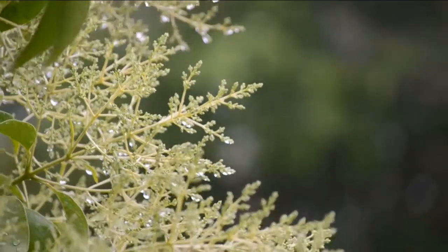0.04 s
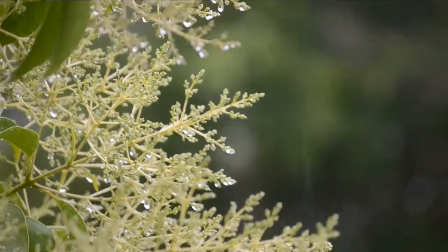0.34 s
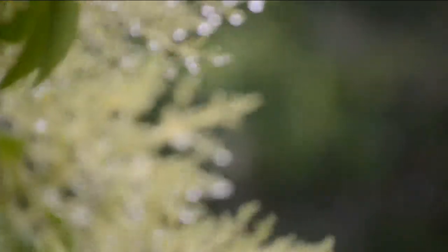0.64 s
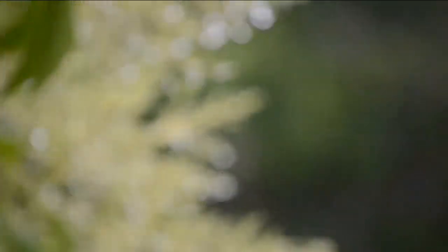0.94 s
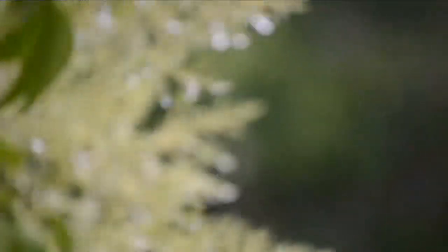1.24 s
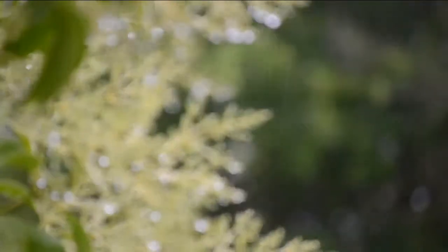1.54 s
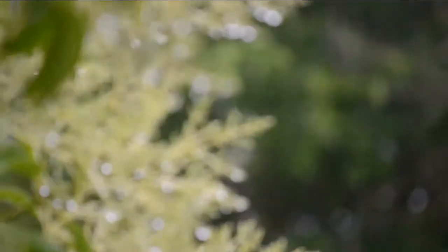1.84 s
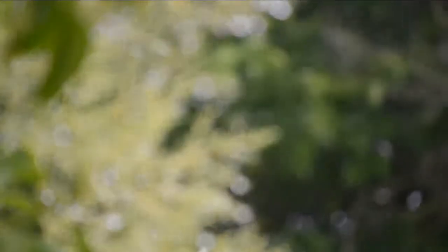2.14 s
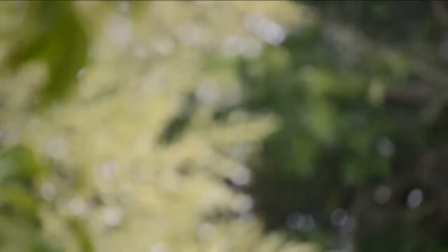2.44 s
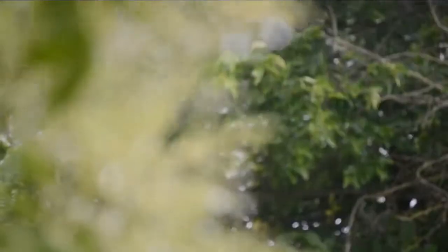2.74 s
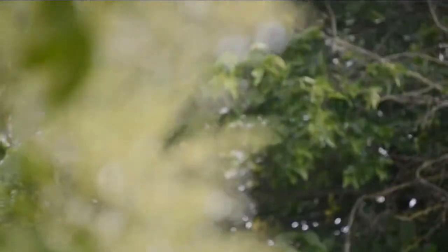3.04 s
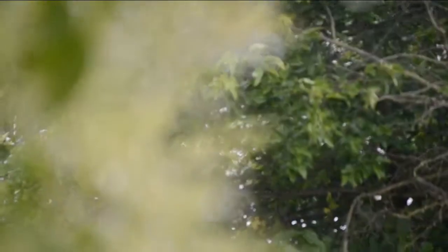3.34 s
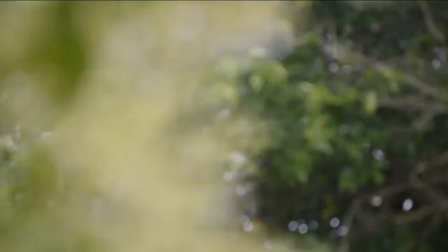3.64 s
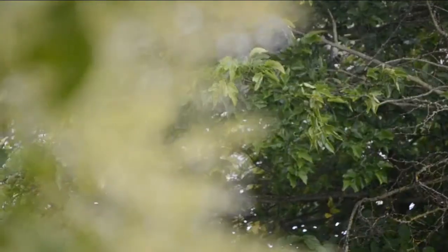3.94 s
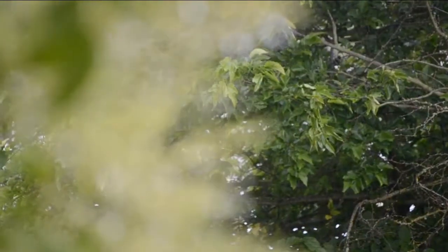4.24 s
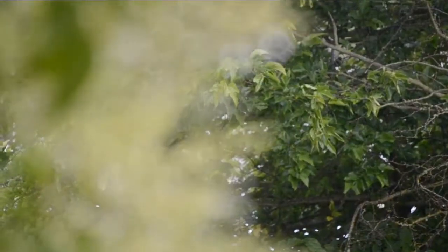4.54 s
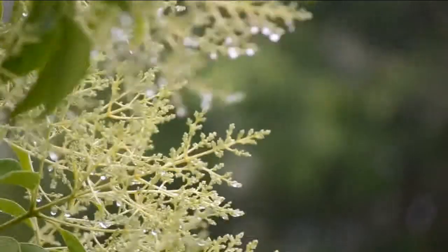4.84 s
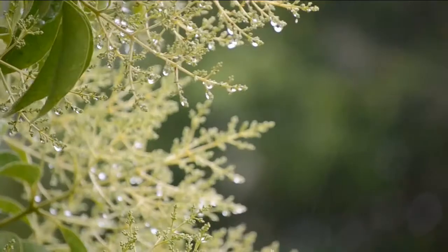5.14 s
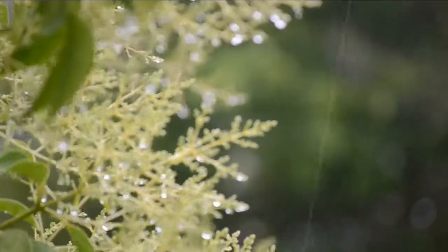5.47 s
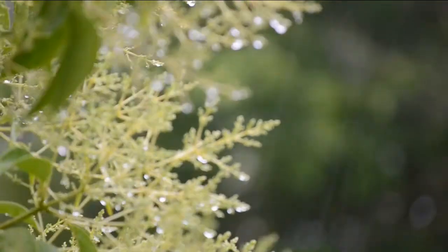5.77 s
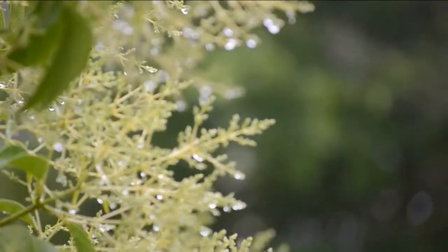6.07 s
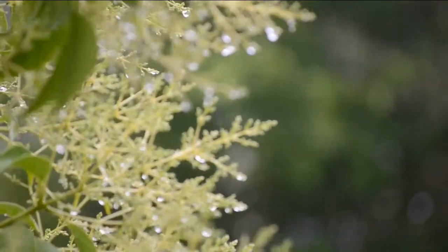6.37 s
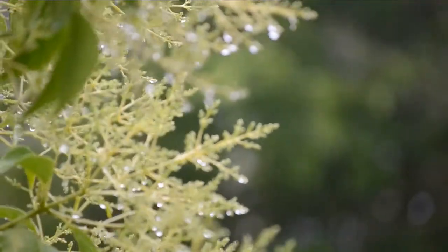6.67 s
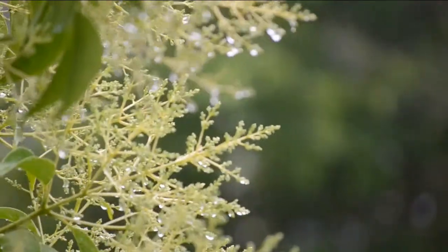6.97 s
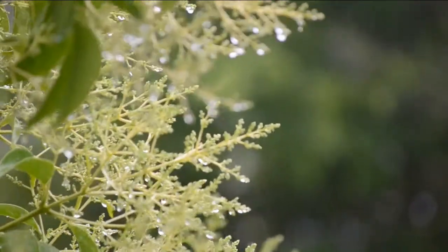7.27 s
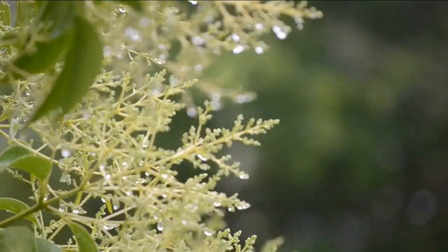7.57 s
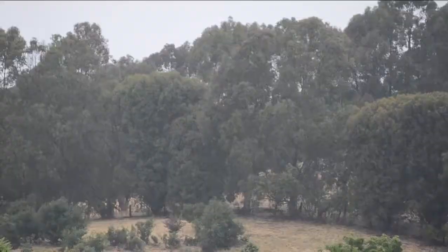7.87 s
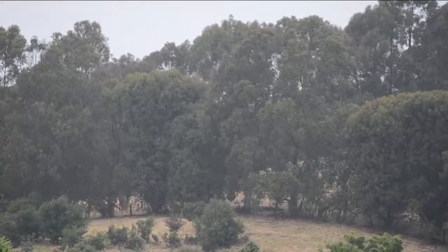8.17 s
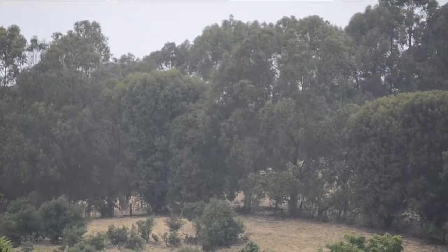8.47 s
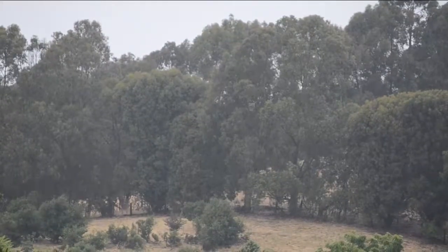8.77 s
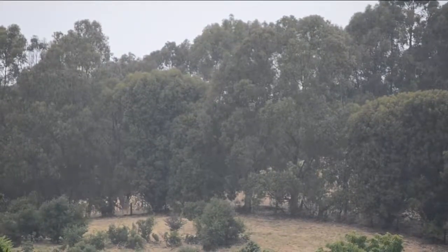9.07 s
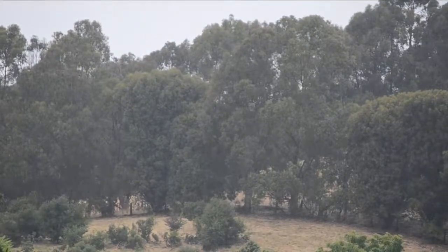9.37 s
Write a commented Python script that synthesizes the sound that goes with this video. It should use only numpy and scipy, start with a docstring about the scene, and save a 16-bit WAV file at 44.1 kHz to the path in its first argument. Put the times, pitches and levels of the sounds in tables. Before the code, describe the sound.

Steady rain falls on a garden for nearly ten seconds: a soft wash from distant trees, a fine hiss, and drops pattering on nearby leaves. A small bird deep in the foliage gives three high falling whistles at about 0.5, 1.1 and 1.6 seconds. From 2.1 to 5.1 seconds a closer bird sings nine short, rapid trills, each alternating lower and higher pips. Fat drips splash close by throughout, the sharpest at 2.6 seconds, and hollow plops hit soaked earth between 1.8 and 5.5 seconds. The rain swells slightly around 4 to 5 seconds, with a few faint distant chirps. The near bird ends with two phrases of loud downward slurs at about 6 and 7.1 seconds, lightly echoed by the trees. At 7.7 seconds the sound drops out for an instant, then the rain continues without birds, its wash slightly fuller.

```python
"""Steady rain on a garden: a soft wash from the far trees, drops pattering on leaves, fat drips
splashing and plopping close by. Small birds sing three falling whistles, nine two-voiced trills and
two slurred phrases, echoed by the foliage. The wash is patchy noise, each drop a noise burst and each
bird note a gliding sine. Near the end the sound drops out for an instant and resumes facing the
wooded hillside."""
import sys
import numpy as np
from scipy import signal
from scipy.fft import rfft, irfft, next_fast_len
from scipy.io import wavfile
from scipy.ndimage import uniform_filter1d, map_coordinates

SR = 44100
rng = np.random.default_rng(int(sys.argv[2]) if len(sys.argv) > 2 else 0)


def file_out(sig):
    """Save sig as 16-bit WAV at sys.argv[1]."""
    # one column per channel
    cols = np.atleast_2d(sig).T
    # limit, then scale
    lim = np.clip(cols, -1, 1)
    pcm = np.round(lim * 32767).astype(np.int16)
    wavfile.write(sys.argv[1], SR, pcm)


N = 423801

BREAK_S, RESUME_S = 7.733, 7.745
# bright splash of a drop on a leaf: (frequency [Hz], gain [dB])
SPLASH_EQ = [(60, -25), (250, -9), (900, -6), (2200, 4.5), (4000, 2.5), (6000, 0.5), (9500, 0.5),
             (12000, -5)]
# dull pat of a drop on a broad leaf: (frequency [Hz], gain [dB])
PAT_EQ = [(100, -27), (330, 4.5), (900, -3), (2100, 6.5), (4000, -1), (10000, -11)]


def wash():
    """Countless far drops merge into a soft roar, with a hiss of fine spray on top."""
    # tone of the garden, the hillside and the spray: (frequency [Hz], gain [dB])
    garden_eq = [(25, -37), (48, -25), (66, -20), (90, -10), (150, -13.5), (190, -6), (280, -7.5),
                 (360, -5), (450, -7), (690, -1.5), (810, -2.5), (930, 0.5), (1400, -4), (2500, -9),
                 (4200, -13.5), (6000, -21.5), (11000, -61)]
    hillside_eq = [(25, -36), (48, -29), (85, -14.5), (150, -15.5), (215, -7), (340, -6.5), (490, -8),
                   (600, -2.5), (820, -4), (950, 0), (1400, -5), (2500, -10), (4200, -15.5), (6000, -25),
                   (11000, -75)]
    spray_eq = [(1000, -39), (3000, 6.5), (5000, 2), (7000, 3.5), (9500, 1.5), (12000, -3.5)]
    t = np.arange(N) / SR
    gust_db = 1.5 * np.exp(-((t - 4.95) / 0.55) ** 2)  # one gust shakes more water from the trees
    garden = amp(-38.5 + gust_db) * rush(garden_eq, patchy_db=1.03)
    hillside = amp(-36.5) * rush(hillside_eq, patchy_db=1.03)
    roar = amp(0.13 * wobble(6.1)) * np.where(t < BREAK_S, garden, hillside)
    spray_db = -48.5 + 0.93 * rain_swell_db() + 0.9 * wobble(25)
    return roar + amp(spray_db) * rush(spray_eq, patchy_db=2.5)


def patter():
    """Rain hits the nearby leaves: splashes and ticks swell with it over an even bed of dull pats."""
    level_db = -49.5 + 1.03 * rain_swell_db()
    splashes = unit(colour(shower(count=420, spread_db=14.5, rise=0.0018, t60=0.059), SPLASH_EQ))
    ticks = unit(colour(shower(count=350, spread_db=10, rise=0.0001, t60=0.002), SPLASH_EQ))
    pats = unit(colour(shower(count=260, spread_db=1.5, rise=0.00043, t60=0.017), PAT_EQ))
    return amp(level_db) * (amp(4) * splashes + amp(-9) * ticks) + amp(-48.5) * pats


def rain_swell_db():
    """The rain rises and falls about its average."""
    # how hard it rains on the nearby leaves: (time [s], relative level [dB])
    intensity = [(0, -51), (1.12, -54), (2.5, -48), (3.93, -45), (4.95, -47.5), (5.5, -46.5), (6.15, -50.5),
                 (7, -47), (8.7, -51.5), (9.6, -50.5)]
    db = np.interp(np.arange(N) / SR, *np.transpose(intensity))
    return db - db.mean()


def shower(count, spread_db, rise, t60):
    """Drops land at random moments, each with its own size and splash time."""
    track = np.zeros(N)
    for when, size, life in rng.random((count, 3)):
        drop = burst(rise, t60 * 2 ** (2 * life - 1), grain_db=1.5)
        add(track, when * N / SR, amp(spread_db * size ** 2) * drop)
    return track


def burst(rise, t60, grain_db):
    """A drop shatters: a cloud of droplet ticks swells and dies away (rise and t60 in seconds)."""
    t = np.arange(SR // 8) / SR
    ticks, sizes = rng.standard_normal((2, len(t)))
    envelope = (1 - np.exp(-t / rise)) * amp(-60 * t / t60)
    return unit(ticks * amp(grain_db * sizes)) * envelope / envelope.max()


def drips():
    """Fat drips from the branches splash or pat close by."""
    # close splashes: (time [s], relative level [dB], decay t60 [s])
    splash_hits = [(0.4344, -29, 0.049), (0.7893, -27.5, 0.076), (0.9862, -26, .045), (1.2164, -32, 0.041),
                   (1.8357, -29, 0.12), (2.145, -27, 0.085), (2.3067, -23.5, 0.074), (2.3645, -27.5, .055),
                   (2.4647, -28, .06), (2.4774, -26, 0.058), (2.5628, -14, .077), (2.6526, -27, .06),
                   (2.7836, -26.5, 0.042), (2.96, -29.5, 0.12), (3.0616, -26.5, .051), (3.5803, -26, 0.093),
                   (3.7737, -25.5, 0.083), (3.908, -23.5, 0.08), (4.214, -24.5, 0.084),
                   (5.3284, -22.5, 0.033), (5.6688, -28, .06), (5.8995, -27.5, .06), (6.5286, -26, 0.03),
                   (7.0559, -37, 0.039), (7.6194, -28.5, 0.2), (7.8406, -29, .06), (8.074, -27, 0.034)]
    # pats on broad leaves: (time [s], relative level [dB])
    pat_hits = [(2.559, -22), (2.7078, -21.5), (4.2122, -21), (4.352, -18.5), (5.3283, -19), (5.477, -24),
                (6.2711, -20), (7.692, -21.5)]
    splashes, pats = np.zeros(N), np.zeros(N)
    for s, db, t60 in splash_hits:
        add(splashes, s - 0.001, amp(db - 4) * burst(rise=0.00091, t60=t60, grain_db=1.5))
    for s, db in pat_hits:
        add(pats, s, amp(db - 3.5) * burst(rise=0.00058, t60=0.021, grain_db=0.5))
    return colour(splashes, SPLASH_EQ) + colour(pats, PAT_EQ)


def plops():
    """A heavy drop thuds into soaked earth and rings one broad, short resonance."""
    # hollow plops: (time [s], resonance [Hz], peak level [dB], decay t60 [s])
    hits = [(1.798, 720, -28.5, .07), (2.086, 630, -30, 0.12), (2.110, 418, -34, 0.059),
            (2.594, 470, -33, .07), (4.030, 1240, -25.5, .07), (4.143, 1080, -30, 0.047),
            (4.966, 710, -25, 0.05), (4.984, 1180, -29, 0.14), (5.327, 940, -26.5, .05),
            (5.372, 350, -33, .08), (5.476, 380, -35, 0.059)]
    track = np.zeros(N)
    for s, hz, db, t60 in hits:
        thud = burst(rise=0.0013, t60=t60, grain_db=-2.5)
        b, a = signal.iirpeak(hz, Q=1.7, fs=SR)
        ring = signal.lfilter(b, a, signal.lfilter(b, a, thud))
        add(track, s, amp(db) * ring / np.abs(ring).max())
    return track


def trills():
    """The near bird trills: the two sides of its syrinx take turns, one low, one high."""
    # trills: (time [s], pip spacing [s], high voice base level [dB])
    cues = [(2.117, .0427, -35), (2.445, 0.044, -34), (2.758, 0.047, -32.5), (3.088, .046, -34),
            (3.463, 0.048, -31.5), (3.825, .046, -34), (4.197, .0455, -34.5), (4.545, .045, -29.5),
            (4.893, 0.049, -30)]
    # the four pips of a trill: (low voice accent [dB], high voice accent [dB])
    accents = [(-1, -1.3), (0, 0), (0, -1.3), (-2, -4.5)]
    # low pip: (time from its centre [s], base pitch [Hz], relative level [dB])
    low_pip = [(-.011, 3110, -6), (-.005, 3010, -.5), (.004, 2930, -1.5), (.017, 2860, -11)]
    # high pip: (time after the low one [s], pitch [ratio], relative level [dB])
    high_pip = [(.013, 1.008, -2.5), (0.023, .998, -1.5), (.034, .994, -2.5), (0.046, .99, -7)]
    song = np.zeros(N)
    for s, spacing, high_db in cues:
        high_hz = 3745 - 28 * (s - cues[0][0])  # the high voice sinks as the song goes on
        for k, (low_accent, high_accent) in enumerate(accents):
            at = s + k * spacing
            # both voices sag a little from pip to pip, and no two pips are quite alike
            length, low_pitch, low_effort, high_pitch, high_effort = rng.standard_normal(5)
            low = np.array(low_pip) * [1 + 0.0796 * length, 1 - 0.0052 * k + 0.006 * low_pitch, 1]
            high = np.array(high_pip) * [1, high_hz * (1 - 0.0137 * k + 0.004 * high_pitch), 1]
            low_gain = amp(-30 + low_accent + 1.6 * low_effort)
            high_gain = amp(high_db + high_accent + 1.6 * high_effort)
            add(song, at + low[0, 0], low_gain * glide(low, waver_db=1.5))
            add(song, at + high[0, 0], high_gain * glide(high, waver_db=0.5))
    return song


def slurs():
    """The near bird ends in two phrases: soft lead-in notes, then loud downward slurs."""
    # notes: (time [s], length [s], opening [Hz], middle [Hz], closing [Hz], level [dB])
    notes = [(6.003, .044, 2650, 2880, 3040, -42.5), (6.01, .04, 4280, 4320, 4300, -50),
             (6.044, 0.041, 3710, 3550, 3700, -39.5), (6.087, 0.058, 3560, 3430, 3520, -41.5),
             (6.153, .054, 2800, 3260, 3630, -39), (6.188, .069, 2893, 2742, 2410, -28),
             (6.254, .032, 3320, 2850, 2530, -27), (7.097, .02, 3850, 3720, 3560, -42),
             (7.109, 0.037, 3360, 2960, 2800, -30), (7.142, .139, 3620, 2884, 2280, -28.5),
             (7.275, 0.029, 2450, 2320, 2220, -39)]
    song = np.zeros(N)
    for s, *shape in notes:
        add(song, s, glide(contour(*shape, bend=2.6, fade_db=4), waver_db=1.5))
    return song


def whistles():
    """Birds deep in the foliage repeat one falling whistle and chirp now and then."""
    # three falling whistles and a faint late one: (time [s], relative level [dB])
    whistle_cues = [(0.489, -38), (1.056, -38.5), (1.574, -36.5), (6.845, -49)]
    # their notes: (delay [s], length [s], opening [Hz], middle [Hz], closing [Hz], accent [dB])
    notes = [(0, 0.039, 4820, 4550, 4500, 0), (0.027, 0.039, 3440, 3280, 3270, -4),
             (0.034, .07, 4650, 4520, 4200, -6.5), (.058, 0.128, 4350, 3610, 2765, 0)]
    # faint chirps from further off: (time [s], pitch [Hz], relative level [dB])
    chirp_cues = [(4.59, 4050, -44), (4.87, 3900, -56), (5.19, 3980, -44)]
    # one chirp: (time [s], pitch [ratio], relative level [dB])
    chirp_shape = [(0, 1.02, -1), (.015, .99, 2.5), (.04, .96, -9)]
    song = np.zeros(N)
    for s, db in whistle_cues:
        for delay, *shape in notes:
            add(song, s + delay, amp(db) * glide(contour(*shape, bend=1.05, fade_db=3.5), waver_db=3))
    for s, hz, db in chirp_cues:
        add(song, s, amp(db) * glide(np.array(chirp_shape) * [1, hz, 1], waver_db=6.5))
    return song


def contour(length, opening, middle, closing, db, bend, fade_db):
    """A note slides onto its middle pitch, swells and slides off; more bend holds it there longer."""
    u = np.linspace(-1, 1, 33)
    hz = middle + (np.where(u < 0, opening, closing) - middle) * np.abs(u) ** bend
    return np.column_stack([length * (u + 1) / 2, hz, db - fade_db * u ** 2])


def glide(points, waver_db):
    """One pure, wavering bird note through (time [s], pitch [Hz], level [dB]) points."""
    s, hz, db = np.transpose(points)
    t = np.arange(s[0], max(s[-1], s[0] + 0.01), 1 / SR)
    phase = 2 * np.pi * np.cumsum(np.interp(t, s, hz)) / SR
    fades = np.clip(np.minimum(t - t[0], t[-1] - t) / 0.0025, 0, 1)
    waver = wobble(130, size=SR // 2)[:len(t)]
    return np.sqrt(2) * fades * amp(np.interp(t, s, db) + waver_db * waver) * np.sin(phase)


def echo(x, decay):
    """Foliage scatters sound into a diffuse tail; decay holds (frequency [Hz], t60 [s]) points."""
    hz, t, noise = signal.stft(rng.standard_normal(SR), SR, nperseg=256)
    tail = signal.istft(noise * amp(-60 * t / along(decay, hz)[:, None]), SR, nperseg=256)[1]
    predelayed = np.pad(tail, (200, 0)) / np.linalg.norm(tail)
    return signal.fftconvolve(x, predelayed)[:N]


def rush(eq, patchy_db):
    """Coloured noise of rms 1 with patches of random gain in time and frequency."""
    noise = signal.stft(rng.standard_normal(N), nperseg=512)[2]
    patches = uniform_filter1d(rng.standard_normal(noise.shape), size=4, axis=0)
    patches = uniform_filter1d(patches, size=12, axis=1)
    mottled = signal.istft(noise * amp(patchy_db * unit(patches)), nperseg=512)[1][:N]
    return unit(colour(mottled, eq))


def colour(x, eq):
    """Minimum-phase EQ through (frequency [Hz], gain [dB]) points."""
    size = 2 * next_fast_len(N // 2 + 8192)
    cepstrum = irfft(np.log(amp(along(eq, np.fft.rfftfreq(size, 1 / SR)))))
    cepstrum[1:size // 2] *= 2
    cepstrum[size // 2 + 1:] = 0
    return irfft(rfft(x, size) * np.exp(rfft(cepstrum)))[:N]


def along(points, hz):
    """Read (frequency [Hz], value) points on a log axis."""
    knots_hz, values = np.transpose(points)
    return np.interp(np.log(hz + 1), np.log(knots_hz + 1), values)


def wobble(rate, size=N):
    """A smooth random curve, rate knots a second."""
    knots = rng.standard_normal(int(size * rate / SR) + 4)
    return map_coordinates(knots, [np.arange(size) * rate / SR])


def add(track, s, sound):
    """Mix a sound into a track at time s."""
    start = max(round(s * SR), 0)
    part = track[start:start + len(sound)]
    part += sound[:len(part)]


def amp(db):
    """Decibels to gain."""
    return 10 ** (np.asarray(db) / 20)


def unit(x):
    """Scale to rms 1."""
    return x / np.sqrt(np.mean(x ** 2) + 1e-20)


def scene():
    """Rain and birds, with the near leaves, the thicket and the far trees answering."""
    # echo of the far trees: (frequency [Hz], decay t60 [s])
    tree_decay = [(300, 0.53), (3000, 0.89), (10000, 0.3)]
    far_birds = whistles()
    near_bird = trills() + slurs()
    drops = drips() + plops()
    leaves = amp(-12) * echo(near_bird, decay=[(3000, 0.11)])
    thicket = amp(-4) * echo(far_birds, decay=[(3000, 0.35)])
    trees = amp(-12) * echo(near_bird + drops, tree_decay)
    return (wash() + patter() + drops + near_bird + amp(-2) * far_birds + leaves + thicket + trees)[None]


def record(dry):
    """The microphone colours the sound, it drops out for an instant, and the top treble is cut off."""
    # microphone tone, with a notch in the treble: (frequency [Hz], gain [dB])
    mic_eq = [(20, -1), (7300, -0.5), (7950, -5), (8500, 1), (9700, -1), (10400, -5), (10900, -13),
              (11400, -28)]
    top_hz = 11375
    t = np.arange(N) / SR
    gate = uniform_filter1d(1.0 * ((t < BREAK_S) | (t > RESUME_S)), size=64)
    gated = colour(dry[0], mic_eq) * gate
    size = next_fast_len(N + SR // 2)
    passband = np.fft.rfftfreq(size, 1 / SR) < top_hz
    return irfft(rfft(gated, size) * passband, size)[None, :N]


dry = scene()
out = record(dry)
file_out(out)
```